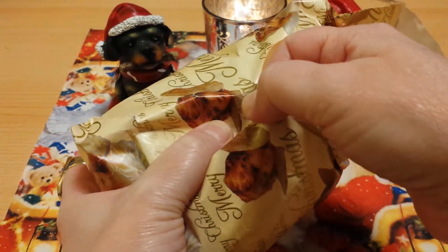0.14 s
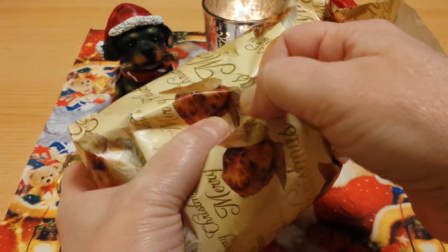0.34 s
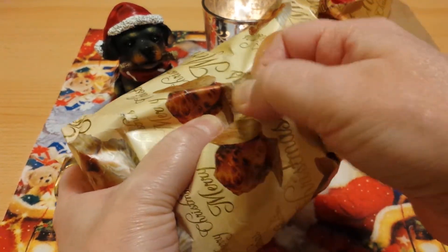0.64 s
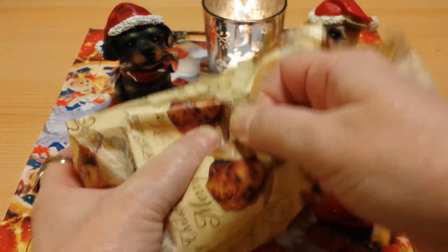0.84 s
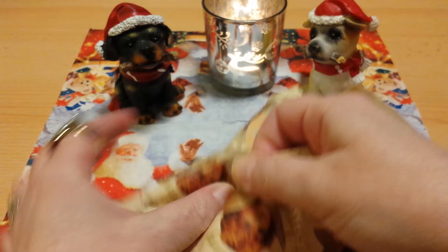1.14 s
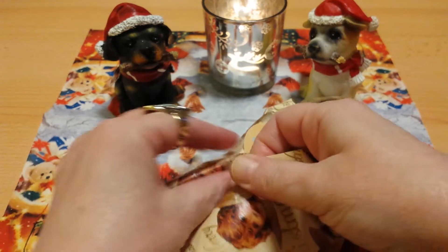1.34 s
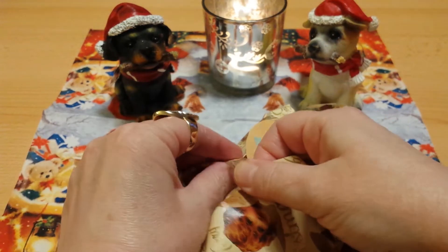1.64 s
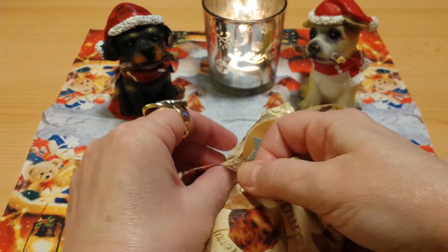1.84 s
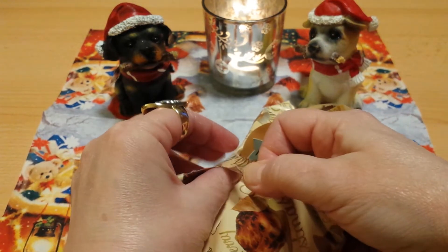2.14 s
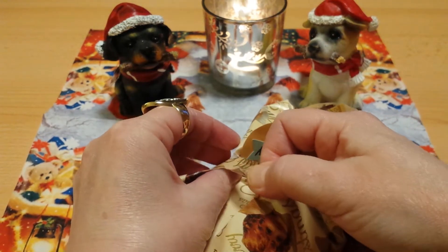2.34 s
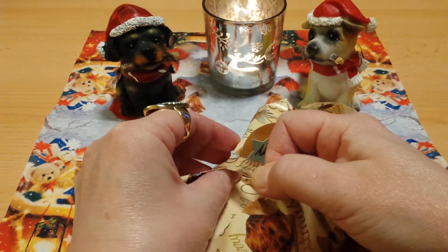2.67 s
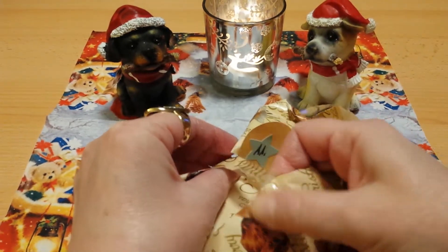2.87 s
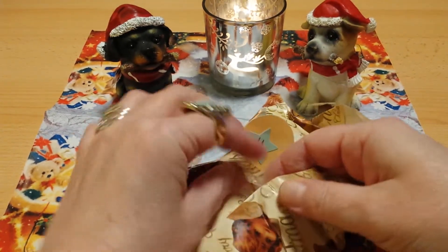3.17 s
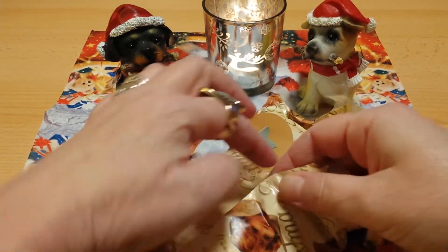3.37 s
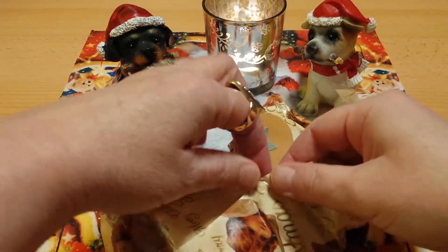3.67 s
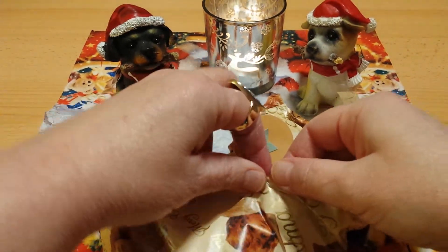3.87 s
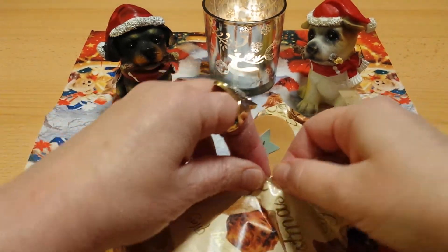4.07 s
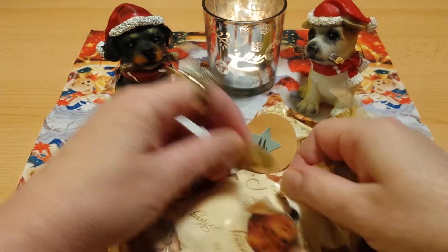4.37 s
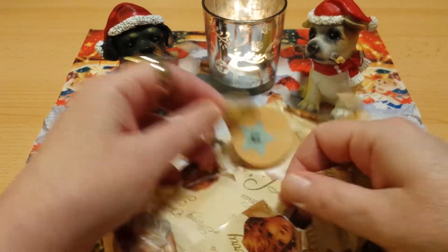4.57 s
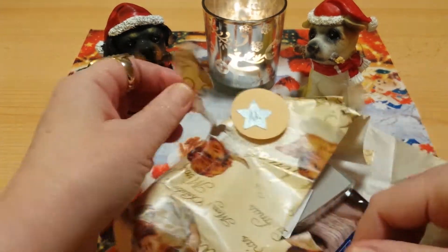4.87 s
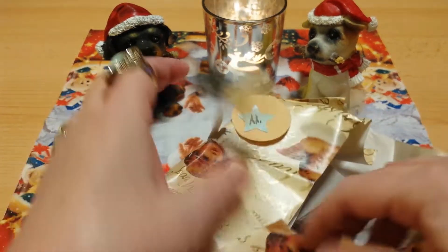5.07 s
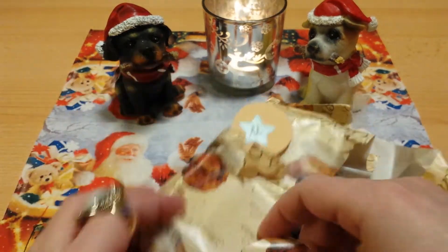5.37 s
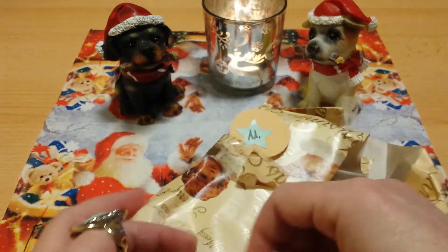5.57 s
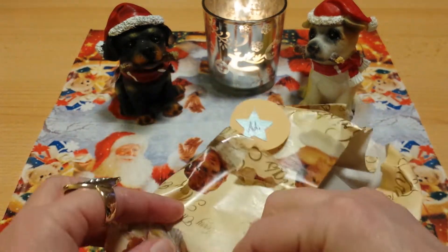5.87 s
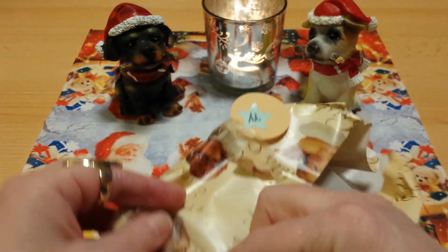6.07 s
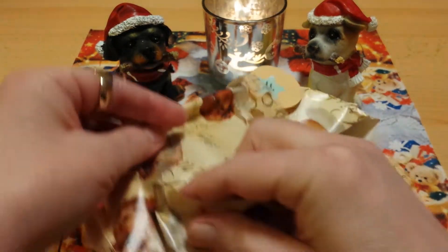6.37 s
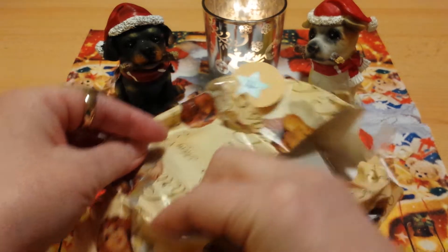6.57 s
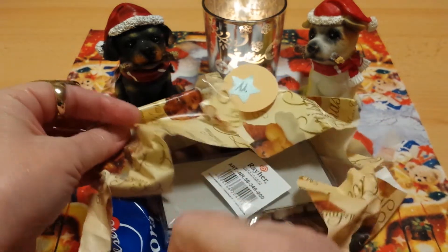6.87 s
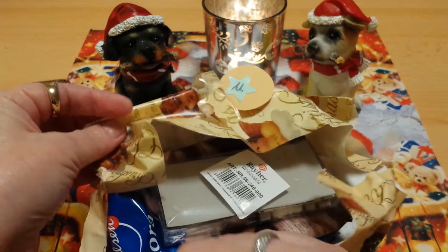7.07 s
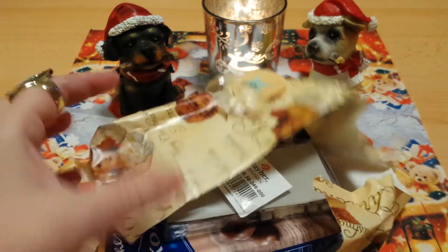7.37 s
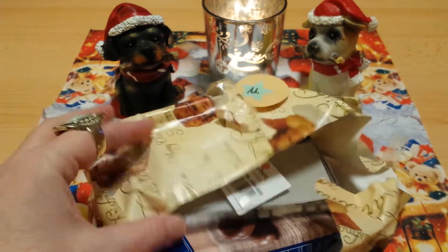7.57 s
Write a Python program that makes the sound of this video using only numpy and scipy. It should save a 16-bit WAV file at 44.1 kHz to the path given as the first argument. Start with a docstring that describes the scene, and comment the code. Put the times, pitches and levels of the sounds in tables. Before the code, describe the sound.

Two hands pull open glossy wrapping paper on a table, very close to a stereo microphone pair. Sharp bright snaps and ticks come in irregular clusters over fine crinkling and rubbing. A low puff of air passes early on, short rips follow around the middle, a calmer stretch, then the densest crackling and tearing before it thins out. Small room, faint murmur and hiss.

```python
"""Glossy wrapping paper is crumpled and torn by two hands on a table, close in front of two microphones.
Each crease that buckles gives a short snap: a noisy bright crack, the ring of the flat facet beside it
and a low flap of the whole sheet. Many small creases and the filtered noise of rubbing fill the gaps.
The moving sheet also pushes one low gust of air; a small room answers, over a faint murmur and hiss."""
import sys
import numpy as np
from scipy import signal
from scipy.fft import rfft, irfft
from scipy.io import wavfile

SR = 44100
rng = np.random.default_rng(int(sys.argv[2]) if len(sys.argv) > 2 else 0)


def int16_out(signal):
    """Quantize to a 16-bit WAV file."""
    q = np.round(np.clip(np.atleast_2d(signal).T, -1, 1) * 32767)
    wavfile.write(sys.argv[1], SR, q.astype(np.int16))


N = 340644  # length of the scene in samples

# creases that snap, loud or faint: (time [s], crack level [dB], facet level [dB], facet pitch [Hz])
CREASE_SNAPS = [(0.0696, -24.5, -29, 1270), (0.1527, -16, -16.5, 3720), (0.2869, -22, -32, 1322),
                (0.2968, -10, -20, 960), (0.445, -18, -36.5, 1536), (0.4787, -6.5, -16.5, 1334),
                (0.4969, -24.5, -26, 1830), (0.5126, -11.5, -14.5, 3890), (0.5515, -24, -20.5, 3700),
                (0.5782, -27.5, -29, 2917), (0.7124, -21.5, -28.5, 1790), (0.7295, -26, -26, 1060),
                (0.751, -38, -24.5, 1480), (0.7934, -6.5, -10.5, 2670), (0.818, -17.5, -18, 3750),
                (0.839, -19, -24, 1810), (0.8488, -14.5, -20, 1251), (0.876, -12.5, -26.5, 1400),
                (0.8996, -25, -26, 2610), (0.9087, -11.5, -12.5, 2180), (1.0345, -19, -26, 860),
                (1.305, -22, -24.5, 1515), (1.4853, -13.5, -13, 2470), (1.514, -18, -24, 1020),
                (1.5455, -13, -16.5, 3103), (1.5547, -28, -16, 2360), (1.6133, -26.5, -18.5, 2495),
                (1.6453, -11.5, -21, 3283), (1.665, -25, -11.5, 2484), (1.7352, -22.5, -16.5, 2394),
                (1.7598, -13, -15.5, 3196), (1.7787, -33, -27, 1640), (1.8851, -17, -13.5, 2364),
                (1.9047, -18.5, -21, 2098), (1.9914, -20, -22, 1320), (2.0223, -22.5, -13, 1690),
                (2.147, -18, -26.5, 1410), (2.1515, -25.5, -23, 2286), (2.1857, -23, -24, 1270),
                (2.3732, -11, -19, 3056), (2.3937, -25.5, -29.5, 2520), (2.4326, -24, -33.5, 3120),
                (2.511, -3, -10.5, 3362), (2.5812, -22.5, -29, 2420), (2.655, -19, -23.5, 1520),
                (2.672, -20, -22.5, 2450), (2.681, -14, -24, 3340), (2.7871, -11, -14.5, 3805),
                (2.838, -15, -18, 2425), (2.9416, -11, -20, 3900), (2.9882, -18.5, -19, 1533),
                (3.0268, -26, -25.5, 1940), (3.0664, -21, -15.5, 2480), (3.0864, -29, -18, 2430),
                (3.105, -25, -31, 1307), (3.12, -15, -11, 3550), (3.135, -10.5, -21, 3270),
                (3.338, -32.5, -22, 1880), (3.35, -11, -26, 1980), (3.5146, -19.5, -12.5, 1980),
                (4.042, -33, -19.5, 3100), (4.0707, -13.5, -17, 1260), (4.18, -30.5, -23.5, 1890),
                (4.2258, -16, -18, 3260), (4.2328, -15.5, -18, 2954), (4.2446, -15, -29, 2437),
                (4.349, -10, -23, 3472), (4.3628, -22, -15, 3275), (4.4539, -24, -25, 1500),
                (4.4648, -22, -22.5, 1948), (4.6243, -35, -34, 1170), (4.8005, -20, -17.5, 1800),
                (4.8293, -26, -27, 3230), (4.8681, -32.5, -23.5, 1980), (4.8806, -9.5, -9, 2760),
                (4.8879, -8.5, -18, 1352), (5.0836, -41.5, -31.5, 1011), (5.1784, -30, -32, 3870),
                (5.5079, -18.5, -27.5, 1457), (5.6578, -23.5, -32, 2860), (5.7454, -20.5, -27, 3880),
                (5.8558, -29, -34, 3270), (5.9493, -19, -24.5, 2650), (5.9626, -19, -6.5, 3335),
                (5.9836, -20, -35, 1680), (6.08, -34, -21, 1100), (6.1392, -6.5, -10.5, 3350),
                (6.2062, -17, -25.5, 1140), (6.258, -21, -26, 962), (6.3331, -20.5, -26, 1160),
                (6.36, -11.5, -16, 2800), (6.5829, -24.5, -23.5, 1090), (6.617, -3.5, -11, 3100),
                (6.7029, -25.5, -29, 1669), (6.712, -28, -28, 1490), (6.8589, -11, -22, 2280),
                (6.885, -18, -27, 3735), (6.8937, -10.5, -21, 3400), (6.9061, -17, -21, 1784),
                (6.915, -13, -25, 1120), (6.9292, -10.5, -17, 1116), (6.9708, -16.5, -25, 1830),
                (7.1678, -23, -33.5, 948.7), (7.6715, -25.5, -22, 3950), (7.7024, -4.5, -11.5, 1440)]
# creases heard mainly as a bright tick, faint to loud: (time [s], crack level [dB])
BRIGHT_TICKS = [(0.0116, -26.5), (0.0397, -20), (0.099, -19), (0.134, -25.5), (0.17, -33.5),
                (0.1893, -15.5), (0.1942, -16), (0.4514, -18), (0.5815, -15), (0.6404, -21.5),
                (0.6533, -25), (0.6761, -22), (0.8367, -16), (0.9289, -22), (1.052, -19), (1.0664, -19),
                (1.1103, -13.5), (1.2441, -11), (1.261, -16), (1.2795, -11.5), (1.3456, -6.5),
                (1.5284, -14), (1.5895, -11), (2.1686, -13), (2.1988, -23), (2.217, -16), (2.294, -28.5),
                (2.6091, -10), (2.6759, -19), (2.8811, -13), (3.0595, -9.5), (3.127, -14), (3.3471, -20.5),
                (3.7316, -29), (3.9096, -19), (3.9904, -26.5), (4.009, -16), (4.0253, -10), (4.0321, -5),
                (4.1609, -21), (4.1859, -18.5), (4.199, -4), (4.258, -14), (4.2667, -12), (4.2745, -16),
                (4.326, -13.5), (4.34, -28), (4.3544, -12), (4.382, -9), (4.4057, -12), (4.6612, -17),
                (5.041, -30), (5.4355, -26), (5.7235, -15.5), (5.7902, -10), (5.8354, -7), (5.8781, -14.5),
                (5.8882, -14.5), (5.902, -10.5), (5.9338, -15), (5.9913, -5.5), (6.002, -16), (6.039, -8),
                (6.0451, -7.5), (6.0495, -17), (6.1239, -16.5), (6.1761, -10.5), (6.21, -18), (6.3739, -12),
                (6.3985, -13.5), (6.4068, -13.5), (6.416, -5), (6.477, -14), (6.5634, -13.5), (6.7995, -6),
                (6.8055, -14), (6.8116, -5.5), (6.8257, -13.5), (6.8321, -8.5), (6.951, -14),
                (6.9949, -11.5), (7.0017, -12), (7.08, -23.5), (7.1848, -13), (7.2123, -25),
                (7.2296, -24.5), (7.2372, -20), (7.2863, -21.5), (7.409, -32.5)]
# the whole sheet flaps or knocks on the table: (time [s], flap level [dB])
SHEET_FLAPS = [(0.2953, -31), (0.3521, -31.5), (0.6748, -31), (0.742, -27), (0.7505, -27), (0.7928, -22),
               (0.8485, -27), (0.909, -18.5), (1.2288, -15), (1.2363, -19.5), (1.247, -21), (1.4855, -19.5),
               (1.5894, -26.5), (1.6008, -23.5), (1.8854, -29), (2.511, -33.5), (2.6565, -23),
               (2.6795, -22.5), (2.7855, -28.5), (3.0662, -32), (3.1411, -23), (4.2854, -24), (4.3126, -24),
               (4.3635, -12.5), (4.382, -15), (4.4667, -22.5), (4.8917, -29), (5.9369, -19), (5.97, -20),
               (6.8929, -27), (7.7067, -18)]
# squeezes of the hands, each setting off many small creases:
# (start [s], hold [s], crack level [dB], facet over crack [dB])
HAND_SQUEEZES = [(0, 0.23, -41, -3), (0.3, 0.032, -38.5, 0), (0.437, 0.11, -44.5, 5),
                 (0.58, 0.018, -34.5, -9.5), (0.675, 0.085, -44, 4), (0.809, 0.049, -33, 1.5),
                 (0.9, 0.036, -32, -6.5), (0.95, 0.21, -35.5, 0), (1.195, 0.082, -34.5, -2),
                 (1.363, 0.058, -37.5, -3.5), (1.479, 0.084, -33.5, -2.5), (1.586, 0.13, -42, -1.5),
                 (1.75, 0.18, -40, -2), (2.002, 0.051, -41.5, -5.5), (2.164, 0.053, -38.5, -3.5),
                 (2.361, 0.035, -39.5, -2), (2.531, 0.16, -39.5, -3.5), (2.807, 0.22, -40.5, -0.5),
                 (3.065, 0.073, -29.5, -5.5), (3.225, 0.11, -42, -3), (3.341, 0.015, -34.5, -4),
                 (3.514, 0.097, -38, -7.5), (3.723, 0.14, -45.5, 2), (3.818, 0.22, -37.5, -5.5),
                 (4.072, 0.046, -45.5, 3), (4.341, 0.046, -26.5, -3.5), (4.601, 0.055, -40.5, -0.5),
                 (4.764, 0.12, -43.5, -1), (4.882, 0.0074, -36, 0.5), (5.024, 0.19, -46, -5.5),
                 (5.21, 0.27, -56, 0), (5.379, 0.16, -41.5, -3.5), (5.588, 0.17, -37.5, -7.5),
                 (5.779, 0.12, -34.5, -3), (5.937, 0.15, -33, -6), (6.154, 0.12, -38, -1.5),
                 (6.323, 0.088, -34.5, -5), (6.483, 0.088, -37, -6.5), (6.62, 0.034, -33, -3),
                 (7.017, 0.065, -42.5, -2), (7.179, 0.24, -43.5, -5.5), (7.582, 0.14, -42.5, -4.5)]
# pulls that rip the sheet: (start [s], hold [s], crack level [dB], facet over crack [dB])
SHEET_TEARS = [(3.985, 0.046, -28, -19.5), (4.207, 0.18, -27.5, -10.5), (6.041, 0.03, -26.5, -17.5),
               (6.751, 0.066, -24.5, -13.5), (6.844, 0.13, -32, -5)]
# how strong the low flap of the rustle and rubbing is over time, on top of the gestures:
# (time [s], level [dB])
LOW_FLAP_LEVEL = [(3.0, -4.5), (3.6, 3.5), (4.3, -3), (5.8, 1)]
# where the hands work: (time [s], left minus right [dB])
HAND_PLACE = [(0, -1), (5.5, 1.5), (6.8, -2.5), (7.72, -1)]
# air pushed by the sheet, before it is shared out left and right: (time [s], centre [Hz], level [dB])
AIR_PUFF = [(.95, 54.67, -58), (1.185, 60.35, -50), (1.2, 105, -27), (1.21, 114, -24), (1.22, 135.1, -17.5),
            (1.237, 227, -27.5), (1.262, 75.4, -42), (1.45, 59.5, -41), (1.6, 50.5, -75)]
# tone colour of each microphone: (frequency [Hz], gain [dB])
LEFT_COLOUR = [(30, -20), (150, -5), (300, -4), (750, 1.5), (1200, 3.5), (3800, 5.5), (5500, 13),
               (6200, 16.5), (7200, 8), (9000, -3), (15000, -26.5)]
RIGHT_COLOUR = [(30, -21.5), (100, -9), (300, -3.5), (750, 2.5), (1200, 7.5), (3800, 6), (6000, 16),
                (7000, 21), (8200, 12), (10000, 3), (15000, -10)]

# how fast each gesture swells and dies away, in dB per second
SQUEEZE_RISE_DB_S, SQUEEZE_FALL_DB_S = 900, 163
TEAR_RISE_DB_S, TEAR_FALL_DB_S = 1500, 505
# flap over facet, and sizzle (the highest treble) over crack
SQUEEZE_FLAP_DB, SQUEEZE_SIZZLE_DB = -5, -10.5
TEAR_FLAP_DB, TEAR_SIZZLE_DB = -5, -0.5
SNAP_FLAP_DB = -21.5  # typical flap over facet
TICK_FACET_DB, TICK_FLAP_DB = -12.5, -29.5  # both over crack
RIP_DB = -33  # gesture crack level above which the sheet counts as ripping
RIP_DRAG, RIP_DENSITY = 1.3, 4  # then: added burst length; extra creases, times the usual rate

GRAIN = 512  # samples held for one snap
FACET_Q, FLAP_Q = 1.8, 2.1  # low: paper stops ringing within a few swings
PORT_HZ = 6500  # cracks are levelled by their peak around this pitch
TABLE_ECHO_S, TABLE_ECHO_DB = 0.0008565, -11  # typical delay; it varies from snap to snap
PATCHY_DB = 1.5  # how far the colours of the hiss drift apart
MURMUR_DB, MURMUR_CUTOFF_HZ, HISS_DB = -59.5, 296, -61  # before the microphones
ROOM_T60_S, ROOM_TREBLE_T60_S, ROOM_GAP_S, ROOM_DB = 0.48, 0.22, 0.0029, -13
TOP_HZ = 15900  # nothing is kept above this


def undb(db):
    """Turn decibels into a plain gain."""
    return 10 ** (np.asarray(db) / 20)


def unit(x):
    """Scale each row to rms 1."""
    return x / np.sqrt(np.mean(x ** 2, axis=-1, keepdims=True))


def ring(f, hz, q):
    """Response of one resonance at frequencies f, gain 1 at its centre."""
    s = 1j * f / hz
    return (s / q) / (1 + s / q + s * s)


def band(x, lo_hz, hi_hz):
    """Keep only one band of frequencies, scaled to rms 1."""
    return unit(signal.sosfilt(signal.butter(2, [lo_hz, hi_hz], "bandpass", fs=SR, output="sos"), x))


def lowpass(x, order, hz):
    """Keep only what lies below hz, with a soft edge."""
    return signal.sosfilt(signal.butter(order, hz, fs=SR, output="sos"), x)


def gestures(t, rows, rise_db_s, fall_db_s, flap_db, sizzle_db):
    """Power of crack, facet, flap and sizzle at times t: each gesture rises, holds and dies away."""
    start, hold, crack_db, facet_db = np.transpose(rows)[:, :, None]
    before, after = np.maximum(start - t, 0), np.maximum(t - start - hold, 0)
    db = crack_db - rise_db_s * before - fall_db_s * after
    offsets_db = (0, facet_db, facet_db + flap_db, sizzle_db)
    return np.array([np.sum(undb(db + over) ** 2, axis=0) for over in offsets_db])


def rustle_at(s):
    """Levels of crack, facet, flap and sizzle, and left-right balance, all in dB, at times s."""
    t = np.arange(0, N / SR, .002)
    power = gestures(t, HAND_SQUEEZES, SQUEEZE_RISE_DB_S, SQUEEZE_FALL_DB_S,
                     SQUEEZE_FLAP_DB, SQUEEZE_SIZZLE_DB)
    power += gestures(t, SHEET_TEARS, TEAR_RISE_DB_S, TEAR_FALL_DB_S, TEAR_FLAP_DB, TEAR_SIZZLE_DB)
    power[2] *= undb(np.interp(t, *np.transpose(LOW_FLAP_LEVEL))) ** 2
    balance_db = np.interp(s, *np.transpose(HAND_PLACE))
    return [np.interp(s, t, 10 * np.log10(p)) for p in power] + [balance_db]


def column(values):
    """Stand the values upright, one row per snap."""
    return np.asarray(values, float)[:, None]


def peak(x):
    """Largest swing in each row."""
    return np.abs(x).max(axis=1, keepdims=True)


def buckle(s, crack_db, facet_db, facet_hz, flap_db, pan_db, burst_s, shared=0.12):
    """Snaps at times s: a jumping crease cracks and swings its facet and the sheet, heard from two sides."""
    t, f = np.arange(GRAIN) / SR, np.arange(GRAIN // 2 + 1) * SR / GRAIN
    chance = rng.standard_normal((len(s), 3 * GRAIN + 4))
    length = column(burst_s * np.exp(.3 * chance[:, -1]))
    # the crack starts at once, drops fast and trails off
    trail = np.exp(-t / (0.47 * length)) + 0.43 * np.exp(-t / (2.56 * length))
    sharp = np.minimum(t / .0001, 1) * trail
    common = chance[:, :GRAIN] * sharp
    # the crease first jumps in one go, which swings facet and sheet alike for both microphones
    envelope = t / length * np.exp(-t / length)
    jump = rfft(envelope * (1 + 1.9 * chance[:, :GRAIN]) * np.exp(-t / 0.00016), axis=1)
    facet_hz = column(facet_hz)
    facet = irfft(jump * ring(f, facet_hz, FACET_Q) * ring(f, facet_hz, 0.26), axis=1)
    flap_hz = column(360 * np.exp(0.13 * chance[:, -2]))
    flap = irfft(jump * ring(f, flap_hz, FLAP_Q) * ring(f, flap_hz, 0.37), axis=1)
    # each crease has its own colour
    bright = ring(f, column(10500 * np.exp(0.37 * chance[:, -4])), 0.23)
    bright = bright * f / (f - 1j * 2700) * (1 + 1j * f / 11000)
    lag = column(1.56 + 3.15 * chance[:, -3]) / SR  # from one microphone to the other
    echo_s = TABLE_ECHO_S * np.exp(0.235 * column(chance[:, -2]))
    echo = 1 + undb(TABLE_ECHO_DB) * np.exp(-2j * np.pi * f * echo_s)
    at = (np.clip(s, 0, N / SR) * SR).astype(int)[:, None] + np.arange(GRAIN)
    out = np.zeros((2, N + GRAIN))
    for ear, side in enumerate((.5, -.5)):
        own = chance[:, (ear + 1) * GRAIN:(ear + 2) * GRAIN] * sharp
        spec = rfft(np.sqrt(shared) * common + np.sqrt(1 - shared) * own, axis=1) * bright
        port_peak = peak(irfft(spec * ring(f, PORT_HZ, 1.246), axis=1))
        crack = irfft(spec, axis=1) / port_peak * 0.55
        grain = undb(column(crack_db + side * pan_db)) * crack
        grain += undb(column(facet_db + side * pan_db)) * facet / peak(facet)
        # the long waves of the flap bend round things and lean to neither side
        grain += undb(column(flap_db)) * flap / peak(flap)
        # 8 samples of delay for all leave room for the lag
        path = echo * np.exp(-2j * np.pi * f * (side * lag + 8 / SR))
        placed = irfft(rfft(grain, axis=1) * path, axis=1)
        out[ear] = np.bincount(at.ravel(), placed.ravel(), N + GRAIN)[:N + GRAIN]
    return out[:, :N]


def rustle(count=1500, spread_db=3.0, own_db=2.5):
    """Many small creases at random moments, denser in rips, some larger, each with its own facet."""
    u, g = rng.random((count, 2)).T, rng.standard_normal((count, 5)).T
    t = np.arange(0, N / SR, .002)
    so_far = np.cumsum(1 + RIP_DENSITY * (rustle_at(t)[0] > RIP_DB))
    s = np.interp(u[0] * so_far[-1], so_far, t)
    crack_db, facet_db, flap_db, _, pan_db = rustle_at(s)
    size_db = -spread_db * np.log(1 - .985 * u[1])  # large ones are rare, and there is a largest size
    facet_hz = np.clip(1700 * np.exp(0.57 * g[2]), 600, 4500)
    return buckle(s, crack_db + size_db + 2.0 * g[3] - 4.0,
                  facet_db + size_db + own_db * g[0], facet_hz,
                  flap_db + size_db + own_db * g[1] - 0.5,
                  pan_db + 5.8 * g[4], burst_s=.0006)


def rubbing(flicker_db=3.0, own_db=2.0, rip_db=0.44, flicker_hz=200):
    """Fibres part and sheets slide: a hiss too dense for single clicks, in spurts of milliseconds."""
    crack_db, facet_db, flap_db, sizzle_db, pan_db = rustle_at(np.arange(N) / SR)
    ripping = np.clip((crack_db - RIP_DB) / 4, 0, 1)  # the harder the pull, the more the hiss breaks up
    walks = band(rng.standard_normal((5, N)), 4.5, flicker_hz)
    # all bands flicker together, and each also alone
    spurts = undb((flicker_db + rip_db * ripping) * walks[0] + own_db * walks[1:])
    noise = rng.standard_normal((3, N))
    near = noise[0] + 1.48 * noise[1:]  # partly alike in both microphones
    # the facets under the fingers change, so the middle of the hiss drifts between colours
    drift = undb(PATCHY_DB * band(rng.standard_normal((4, N)), 3.0, 7.5))
    edges = np.geomspace(700, 4200, 5)
    facets = sum(drift[k] * band(near, edges[k], edges[k + 1]) * np.sqrt(edges[k]) for k in range(4))
    hiss = spurts[0] * undb(crack_db - 9.0) * band(noise[1:], 3200, 16700)
    hiss += spurts[1] * undb(sizzle_db) * band(noise[1:], 11000, 16600)
    hiss += spurts[2] * undb(facet_db - 9.5) * unit(facets)
    # long waves reach both microphones nearly alike
    hiss += spurts[3] * undb(flap_db - 2.5) * band(noise[0] + 0.14 * noise[1:], 185, 510)
    # the sheet stirs the air, most at the right microphone
    stirred = undb(flap_db + [[-11], [0]]) * band(noise[1:], 30, 115)
    return hiss * undb(np.array([pan_db, -pan_db]) / 2) + stirred


def stillness():
    """Low room murmur, made of noise without its treble, and faint full-range hiss."""
    murmur = lowpass(rng.standard_normal((2, N)), 1, MURMUR_CUTOFF_HZ)
    return undb(MURMUR_DB) * unit(murmur) + undb(HISS_DB) * rng.standard_normal((2, N))


def dragged(s):
    """Typical length of a snap's burst in seconds: short on its own, drawn out while the sheet rips."""
    return 0.00045 * (1.5 + RIP_DRAG * (rustle_at(s)[0] > RIP_DB))


def snaps():
    """The single creases, ticks and flaps; creases and ticks scatter about where the hands work."""
    s, crack_db, facet_db, facet_hz = np.transpose(CREASE_SNAPS)
    g = rng.standard_normal((len(s), 2)).T
    flap_db = facet_db + SNAP_FLAP_DB + 3 * g[1]
    creases = buckle(s, crack_db, facet_db, facet_hz, flap_db, rustle_at(s)[4] + 3 * g[0],
                     burst_s=dragged(s))
    s, db = np.transpose(BRIGHT_TICKS)
    g = rng.standard_normal((len(s), 2)).T
    facet_hz = 2600 * np.exp(0.092 * g[1])
    ticks = buckle(s, db, db + TICK_FACET_DB, facet_hz, db + TICK_FLAP_DB,
                   rustle_at(s)[4] + 3 * g[0], burst_s=dragged(s))
    s, db = np.transpose(SHEET_FLAPS)
    flaps = buckle(s, db - 40, db - 33, 620 + 0 * s, db, 0 * s, burst_s=0.00024)
    return creases + ticks + flaps


def room(x):
    """Echoes blur into a tail after a short gap; treble dies sooner, bass is partly alike on both sides."""
    t = np.arange(int(.6 * SR)) / SR
    noise = rng.standard_normal((3, len(t)))
    low = lowpass(noise, 1, 1500)
    onset = 1 - np.exp(-(t / ROOM_GAP_S) ** 2)
    bass = (low[0] + 0.62 * low[1:]) * undb(-60 * t / ROOM_T60_S)
    treble = (noise - low)[1:] * undb(-60 * t / ROOM_TREBLE_T60_S)
    tail = unit((bass + treble) * onset) * undb(ROOM_DB) / np.sqrt(len(t))
    return signal.fftconvolve(x.mean(axis=0, keepdims=True), tail, axes=1)[:, :N]


def puff():
    """A low gust, a wavering tone that rises and sinks as the sheet sweeps past, mostly on the right."""
    s, hz, db = np.transpose(AIR_PUFF)
    t = np.arange(N) / SR
    phase = 2 * np.pi * np.cumsum(np.interp(t, s, hz)) / SR
    sway = unit(lowpass(rng.standard_normal((2, N)), 2, 60))
    wavering = np.cos(phase + 0.87 * sway[0]) + 0.87 * sway[1]
    gust = undb(np.interp(t, s, db, -200, -200)) * wavering
    return gust * undb([[-16], [6]])  # left, right


def colour(x, points):
    """Filter with the given gain curve that answers at once, never ahead of the sound."""
    hz, db = np.transpose(points)
    f = np.maximum(np.arange(1025) * SR / 2048, 1)
    log_gain = np.interp(np.log(f), np.log(hz), db) * np.log(10) / 20
    # folding the cepstrum (the spectrum of the log gain) puts the filter's whole response after time zero
    ceps = irfft(log_gain)
    ceps[1:1024] *= 2
    ceps[1025:] = 0
    response = irfft(np.exp(rfft(ceps)))
    return signal.fftconvolve(x, response)[:len(x)]


def scene():
    """Paper sounds, their room tail, the gust of air and the quiet background, added up."""
    paper = snaps() + rustle() + rubbing()
    return paper + room(paper) + puff() + stillness()


def record(dry):
    """Each microphone rings in the treble at its own pitch; peaks round off, lowest and highest ends are cut."""
    heard = np.array([colour(dry[0], LEFT_COLOUR), colour(dry[1], RIGHT_COLOUR)])
    heard = signal.sosfilt(signal.butter(1, 30, "highpass", fs=SR, output="sos"), heard)
    rounded = heard / (1 + (heard / .8) ** 4) ** .25
    top_cut = signal.ellip(12, .3, 110, TOP_HZ, fs=SR, output="sos")
    return signal.sosfilt(top_cut, rounded)


dry = scene()
out = record(dry)
int16_out(out)
```